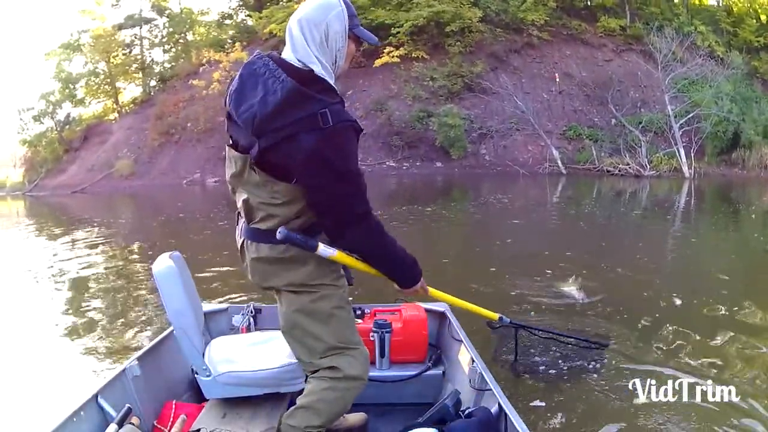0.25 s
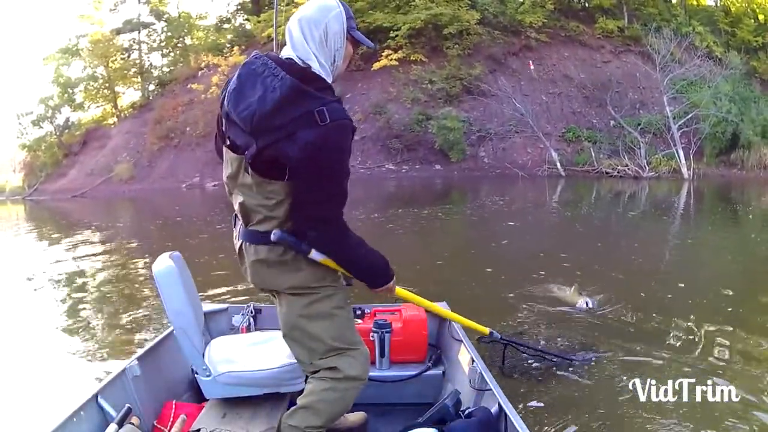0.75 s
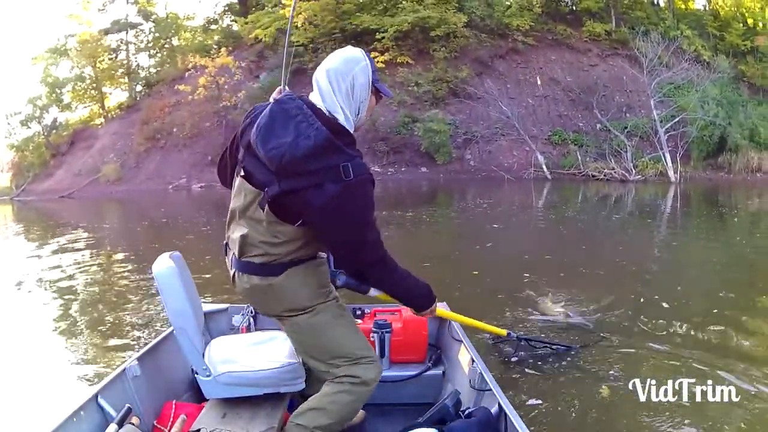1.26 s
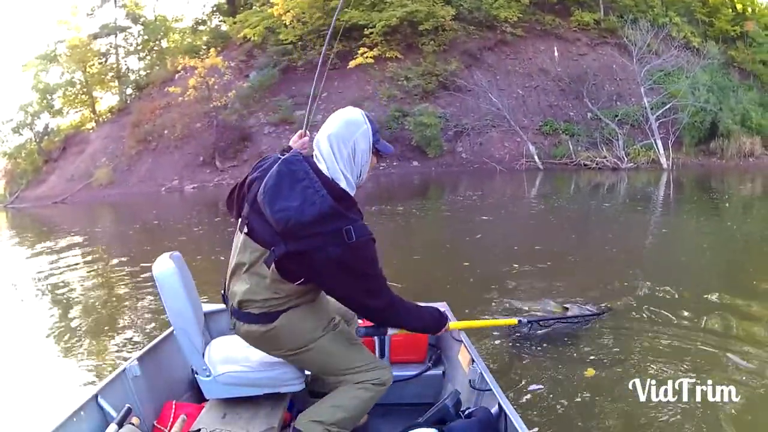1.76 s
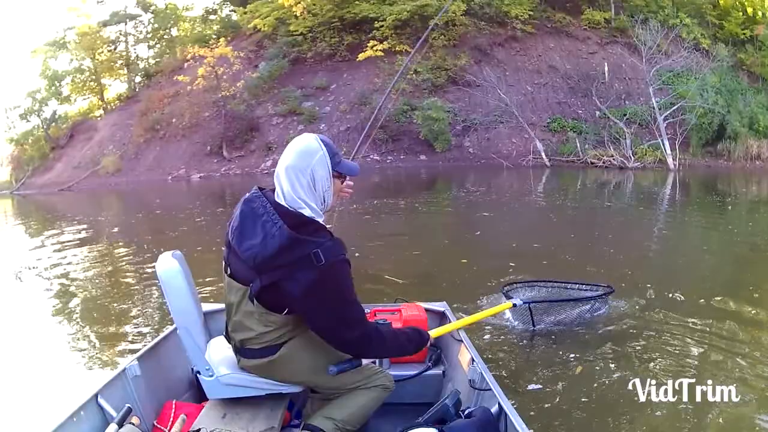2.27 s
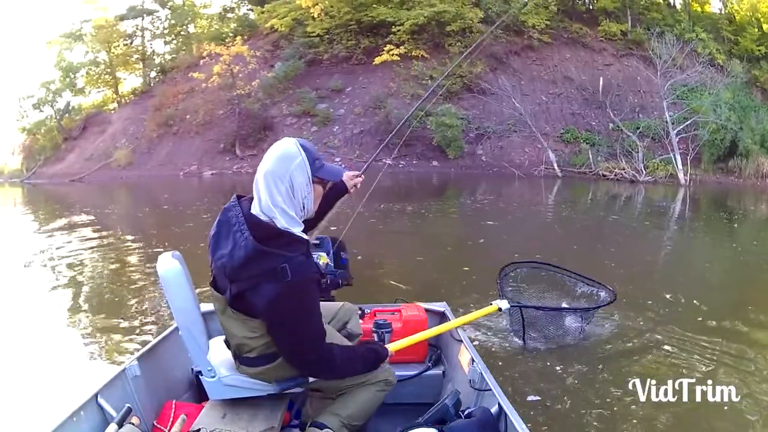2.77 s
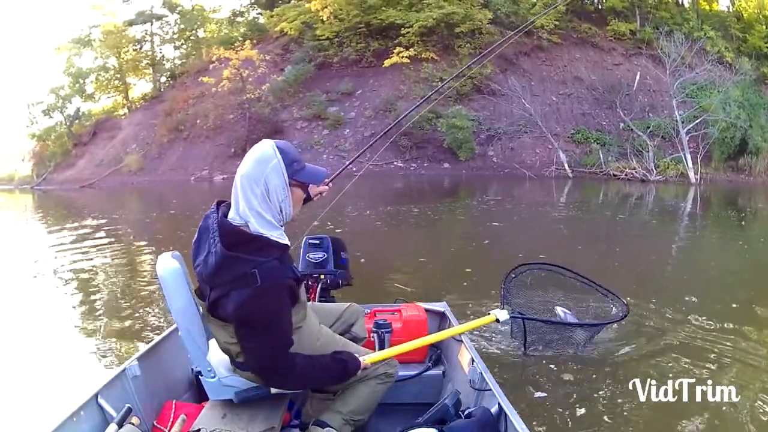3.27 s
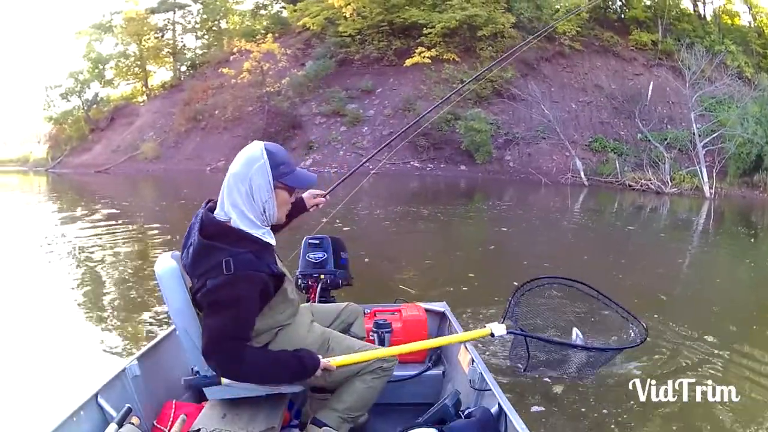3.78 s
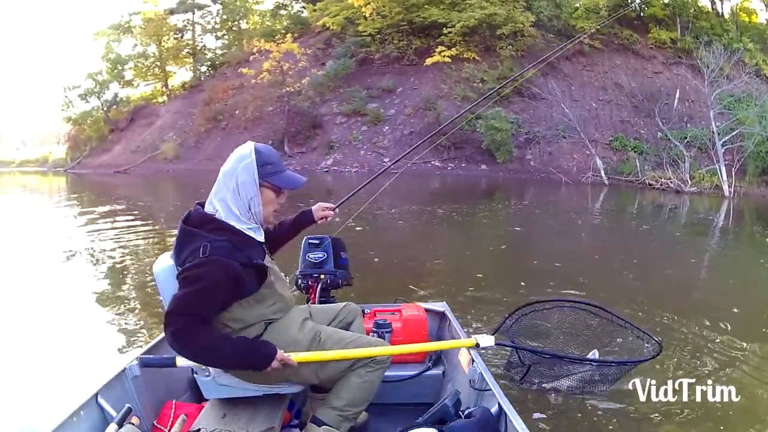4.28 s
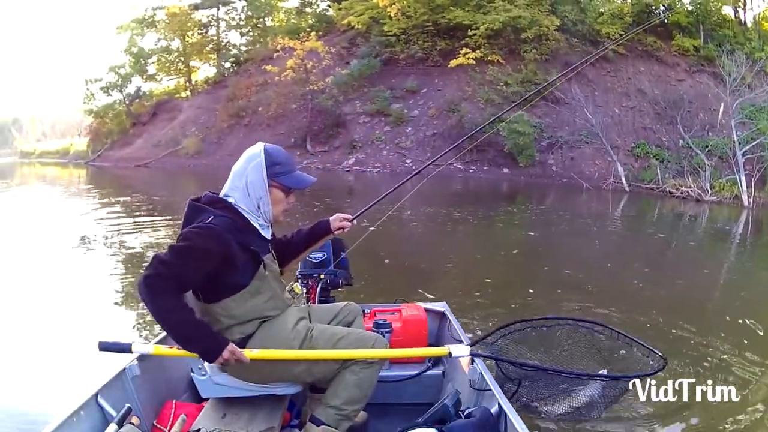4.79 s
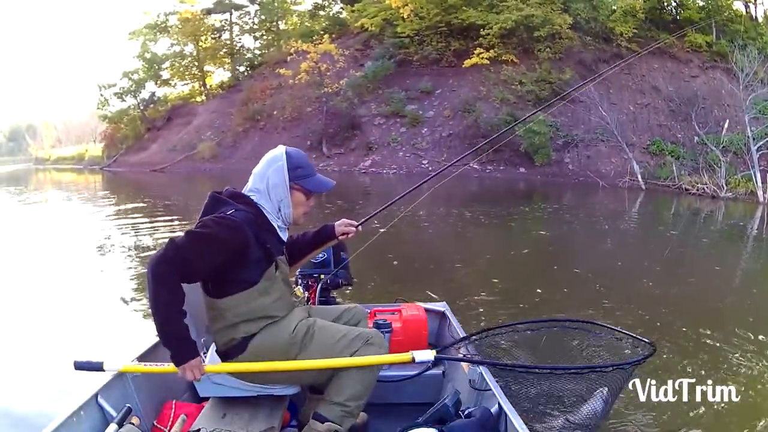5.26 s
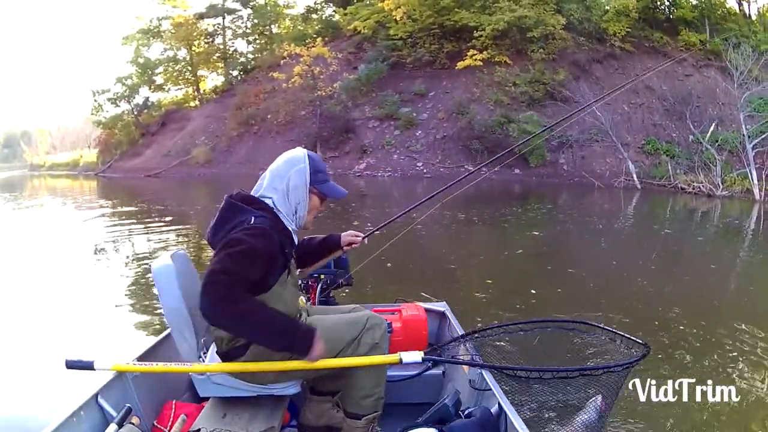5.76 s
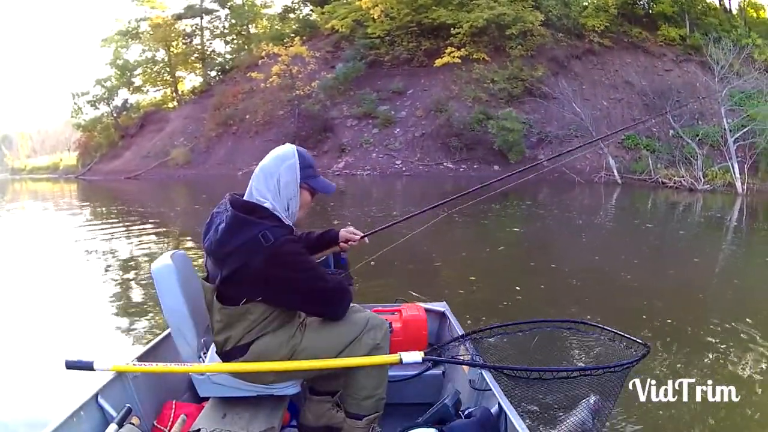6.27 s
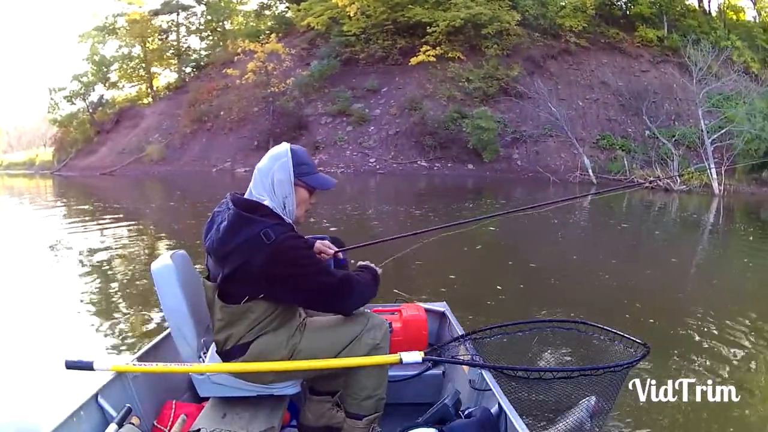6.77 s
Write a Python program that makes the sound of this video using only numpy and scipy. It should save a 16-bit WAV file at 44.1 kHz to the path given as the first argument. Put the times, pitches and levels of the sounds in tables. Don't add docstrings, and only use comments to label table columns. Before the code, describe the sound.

One dull thump in a small aluminium boat, net drips and faint rubbing, then a burst of loud hollow metallic knocks that clatter to rest.

```python
import sys
import numpy as np
from scipy import signal
from scipy.fft import rfft, irfft
from scipy.io import wavfile
from scipy.ndimage import uniform_filter1d, map_coordinates

SR = 44100
rng = np.random.default_rng(int(sys.argv[2]) if len(sys.argv) > 2 else 0)


def to_wav(s):
    ch = np.atleast_2d(s).T
    pcm = np.round(np.clip(ch, -1, 1) * 32767)
    wavfile.write(sys.argv[1], SR, pcm.astype(np.int16))


def boost(x):
    u = np.asarray(x, float) / 20
    return 10 ** u


N = 310023

# start_s, level_db (peak), weight_db (low modes), hardness_db (crack), chatter_s
NUDGES = [
    (2.593, -41.5, 4, -9, 0.007),
    (2.918, -40, -12, -28, .03),
    (3.372, -36.5, 1, -37, 0.034),
    (4.045, -29.5, -14, -30.5, .02),
]
KNOCKS = [(4.452, -21.5, 1.5, -25.5, 0.022), (4.482, -24, 3, -58, 0.061), (4.512, -26.5, 5, -48, 0.018),
          (4.567, -27, -23, -33, .008), (4.643, -23.5, -6, -20.5, .008), (4.653, -16, -7, -21, 0.0031),
          (4.731, -22.5, -1.5, -21, 0.0042), (4.854, -9, -5, -21, 0.0094), (4.868, -14, -4, -41, 0.0053),
          (4.907, -9.5, 1, -10.5, 0.0078), (4.924, -15, -10, -30, 0.0061)]
RATTLE = [(5.108, -17, 3, -12.5, 0.017), (5.135, -24, 1, -40, 0.024), (5.176, -17.5, 3, -15, 0.014),
          (5.204, -26.5, -1, -42, 0.011), (5.276, -29.5, -15, -8.5, 0.0082),
          (5.282, -18.5, 2.5, -14.5, 0.019), (5.373, -19.5, -3, -14, 0.017), (5.403, -16, 2, -21.5, 0.012),
          (5.416, -17.5, 4, -25, 0.012), (5.43, -15.5, -7, -29, 0.012), (5.458, -22, 7, -16, 0.018),
          (5.499, -36, 22.5, -19, 0.0083), (5.562, -33, 6, -22, 0.02), (5.591, -25, -9, -20.5, 0.004)]
SIT_DOWN = [
    (1.89, -35.5, 2, -13, 0.038),
    (1.9215, -11.5, 2, -20, 0.0022),
]

# pitch_hz, level_db, t60_s
HULL_MODES = [(74, -15, 0.69), (116.3, -15.5, 0.53), (137.7, -12.5, 0.98), (175, -7, 0.3),
              (280.2, -4, 0.29), (308.2, -5.5, 0.44), (353, 0, 0.16), (432, -7, 0.5), (461.5, -1.5, 0.35),
              (524.5, -3, 0.25), (611, -6, 0.082), (600, -8, 0.45), (689, -4, 0.42), (725, -4.5, 0.11),
              (830, -27, 0.067), (824, -2, 0.4), (917, 0.5, 0.13), (945, -2.5, 0.28), (983, 0, 0.25),
              (1040, -60.5, 0.28), (1168, -2.5, 0.24), (1206, -2.5, 0.19), (1540, -13.5, 0.23),
              (1606, -10.5, 0.15), (1760, -17, 0.18), (2060, -11, 0.064), (2230, -31, 0.12),
              (2720, -11.5, 0.073), (3010, -11, 0.07)]
# pitch_hz, level_db, t60_s
BENCH_MODES = [(226.7, -15.5, 0.3), (287, -15.5, 0.19), (317, -14, 0.23), (435.6, -18.5, 0.37),
               (525, -21, 0.2), (601, -17, 0.24), (626, -21, 0.16), (667, -9, 0.26), (678, -18, 0.15),
               (722, -3, 0.19), (790, -26, 0.11), (855, -11, 0.055), (918, -20, 0.085), (1008, -15, 0.17),
               (1180, -13.5, 0.19), (1480, -9, 0.17)]
# pitch_hz, level_db, t60_s
RIM_MODES = [(293, -8, 0.085), (414, -5.5, 0.13), (482.3, -9.5, 0.37), (600, -12, 0.39), (705, -18, 0.16),
             (762, 0, 0.06), (864, -5, 0.26), (923.5, -3.5, 0.2), (930, -0.5, 0.16), (1001, -8, 0.64),
             (1062, -11, 0.086), (1160, -9, 0.27), (1220, -15.5, 0.19), (1340, -30, .04),
             (1660, -11, 0.037), (2170, -13, 0.044)]
# pitch_hz, level_db, t60_s
DENT_MODES = [
    (869, 1.5, 0.08),
    (945, -18, 0.037),
]
# pitch_hz, density_db (per Hz)
SHEET_SPECTRUM = [(100, -59), (250, -8), (700, -6.5), (980, -3), (1100, -31), (1220, -39), (1400, -25.5),
                  (2200, -17.5), (3200, -28.5), (4000, -36), (5000, -64), (7000, -67)]
# pitch_hz, density_db (per Hz)
CRACK_SPECTRUM = [(1350, -25), (2300, -11.5), (2600, -42), (3110, -24.5), (3990, -20), (7110, -24),
                  (12100, -20.5), (16000, -28)]
# pitch_hz, t60_s
CRACK_DECAY = [(300, 0.37), (1000, 0.28), (2000, 0.14), (4000, 0.076), (8000, 0.073), (15000, 0.061)]

# start_s, level_db, pitch_hz, t60_s
BENCH_NOTES = [(1.9212, -9, 867, 0.087), (1.9212, -20, 640, 0.082), (1.922, -26.5, 1185, 0.1),
               (1.924, -26, 302, 0.073), (1.93, -17, 947, 0.06), (1.944, -17, 725, 0.089),
               (1.945, -24.5, 1003, 0.13), (1.968, -20.5, 612, 0.14), (1.97, -30, 427, 0.21),
               (1.965, -34, 840, 0.091), (1.922, -31, 1600, 0.027)]
# start_s, level_db, pitch_hz, t60_s
PANEL_NOTES = [(5.417, -32.5, 1835, 0.094), (5.418, -41, 2234, .1), (5.431, -38, 1565, .1),
               (5.458, -38, 2070, 0.075), (4.452, -21.5, 624, 0.13), (4.453, -24.5, 858, .1),
               (4.487, -27, 861, 0.24), (4.49, -27, 705, 0.29), (4.506, -31, 984, .12),
               (4.643, -38, 825, 0.08), (4.728, -31, 471, 0.1), (4.733, -30, 946, 0.097),
               (4.756, -33.5, 623, 0.18), (4.835, -28, 966, 0.18), (4.855, -9, 904, 0.059),
               (4.858, -20.5, 290, 0.13), (4.867, -18, 930, .07), (4.874, -21, 688, 0.18),
               (4.88, -25, 615, 0.05), (4.907, -15, 860, 0.062), (4.908, -20, 1199, 0.15),
               (4.91, -15, 285, 0.11), (4.92, -15.5, 618, 0.1), (4.924, -15.5, 683, 0.16),
               (4.96, -21.5, 118, 0.19), (4.975, -41, 690, 0.12), (4.975, -26, 887, 0.1),
               (5.109, -21, 896, .07), (5.125, -28, 618, 0.1), (5.14, -19, 474, 0.094),
               (5.178, -22, 890, 0.076), (5.373, -29, 600, 0.13), (4.869, -25.5, 177, .2),
               (5.195, -23.5, 476, 0.18), (5.283, -30, 611, 0.26), (5.283, -34, 850, 0.19),
               (5.416, -17.5, 701, 0.26), (5.416, -18.5, 966, 0.19), (5.44, -21, 988, 0.13),
               (5.44, -25, 689, 0.15), (5.453, -21, 186, 0.25), (5.47, -28.5, 489, 0.25),
               (5.591, -28.5, 945, 0.14), (2.81, -37, 856, 0.12), (2.915, -37, 868, 0.18),
               (4.455, -27, 300, 0.19), (4.46, -29, 462, .2), (4.455, -40.5, 1195, 0.26),
                 (4.647, -22, 925, 0.096), (4.643, -28, 1185, 0.12), (4.73, -32.5, 1190, 0.2),
                 (4.855, -25, 1170, 0.11), (4.862, -34, 1550, .08), (4.912, -27, 1550, .1),
                 (5.112, -22.5, 290, .1), (5.118, -28, 1100, 0.19), (5.176, -35, 1000, 0.11),
                 (5.195, -25, 705, 0.11), (5.283, -29, 305, 0.073), (5.3, -28, 1030, .14),
                 (5.305, -29, 477, .12), (5.405, -22, 360, 0.2), (3.36, -44, 1001, .3),
                 (3.95, -47.5, 1001, 0.54), (5.373, -29, 860, 0.054), (4.045, -44.5, 1001, .7),
                 (3.8, -53, 1001, .8), (4.2, -46.5, 1001, .8)]

# start_s, pressure_db
RESTING = [
    (1.95, -41),
    (2.07, -52),
    (2.5, -57.5),
    (2.56, -54),
    (2.77, -47),
    (2.88, -58),
    (2.99, -57),
    (3.75, -53),
    (4.13, -55),
    (4.44, -52),
]
# start_s, pressure_db
SLIDING = [(4.5, -50), (4.63, -44.5), (4.72, -41), (4.81, -40.5), (4.95, -47), (5.18, -54), (5.33, -42.5),
           (5.5, -42.5), (5.64, -49), (5.7, -65), (5.78, -66)]
# pitch_hz, width_hz, level_db (over the pressure)
SINGING_MODES = [
    (1001, 6.73, -7),
    (1160, 14, -14),
    (1200, 14, -13.5),
]
# start_s, level_db, pitch_hz, length_s
FLOOR_BOOMS = [
    (4.84, -24.5, 168, 0.25),
    (5.4, -17, 204, 0.11),
    (5.47, -18, 76.4, 0.21),
]
# start_s, level_db, pitch_hz, length_s
HOOP_CLINKS = [
    (5.278, -38, 3870, 0.026),
    (5.456, -39, 3970, 0.018),
    (5.588, -50.5, 4000, 0.018),
]

# start_s, level_db (peak), pitch_hz
DROPS = [(.386, -55, 1400), (.7044, -53, 1350), (.7228, -48, 2070), (.7444, -49, 2070), (.9507, -46, 2250),
         (.9574, -47, 1490), (1.1394, -51, 1450), (1.4656, -41, 1910), (1.5075, -46, 2190),
         (1.5484, -41, 1980), (1.7779, -45, 1900), (2.0622, -36, 1350), (2.077, -43, 4550),
         (2.303, -39, 5700), (2.06, -39, 2200), (2.377, -46, 2100), (2.064, -36, 1050), (2.0844, -48, 2650),
         (2.1375, -38, 2050), (2.1824, -40, 1400), (2.2094, -39, 1280), (2.2473, -38, 1590),
         (2.3052, -40, 2230), (2.354, -34.5, 2270), (2.52, -40, 1390), (2.594, -35, 1900),
         (2.6306, -40, 1780), (2.6594, -50, 1760), (2.6994, -53, 1650), (2.8544, -41, 2040),
         (3.0024, -41, 1850), (3.2725, -45, 1830), (3.3568, -48, 1660), (3.4326, -43, 1650),
         (3.9689, -50, 1650)]
# start_s, level_db (peak), pitch_hz
SMALL_DROPS = [(.645, -44, 4800), (.9762, -41, 4440), (1.0076, -43, 3180), (1.3114, -41, 4030),
               (2.0073, -40, 5900), (2.02, -47, 3000), (2.25, -37, 5300), (2.262, -46, 4200),
               (2.0747, -39, 9000), (2.0747, -47, 11800), (2.0941, -47, 9500), (2.1834, -49, 9000),
               (2.2233, -35, 11000), (2.2233, -43, 8500), (2.2996, -44, 11500), (2.348, -41, 7800),
               (2.209, -42, 2300), (2.0747, -46, 2800), (2.0941, -36, 5690), (2.153, -50, 3320),
               (2.1834, -39, 3780), (2.2239, -29.5, 4300), (2.2544, -45, 3590), (2.304, -46, 8000),
               (2.348, -37, 3450), (2.4245, -39, 4430), (2.4628, -46, 4490), (2.5144, -45, 3810),
               (2.5935, -48, 3830), (2.7806, -44, 3600), (3.4521, -44, 4590)]
# start_s, level_db, pitch_hz, length_s
SLOSHES = [(.68, -59, 1480, 0.087), (.685, -37, 950, 0.069), (.7, -52, 2100, 0.075), (.93, -66, 1800, .04),
           (2.183, -32, 1000, 0.01), (2.21, -34, 1300, 0.0083), (2.245, -53, 3500, 0.018),
           (2.04, -49, 1830, 0.034), (2.17, -49, 1690, 0.16), (2.57, -44, 1820, 0.18),
           (2.6, -29, 725, 0.18), (2.85, -33, 740, 0.12)]
# start_s, level_db, pitch_hz, length_s
RUSTLES = [
    (6.15, -60, 9500, .03),
    (6.455, -65, 9500, .03),
    (6.783, -60, 9300, 0.15),
    (6.98, -57, 8500, 0.031),
]

# start_s, level_db (peak)
LOW_TICKS = [(.07, -52), (.31, -50), (.5457, -54), (.9014, -54), (1.1, -51), (1.307, -50), (2.2997, -50),
             (2.676, -52), (3.603, -56), (4.0542, -54), (6.112, -49)]
# start_s, level_db (peak)
HIGH_TICKS = [(.2598, -45), (.677, -47), (.689, -46), (.703, -47), (3.134, -53), (3.305, -55),
              (3.9938, -52), (4.207, -54), (4.632, -54), (5.135, -50), (5.6421, -52), (5.765, -53),
              (5.787, -51), (5.832, -52), (6.007, -52), (6.2687, -51), (6.488, -50), (6.506, -49),
              (6.6518, -50), (6.8453, -50)]
# pitch_hz, width_hz, level_db
FAR_CHORUS = [
    (2766, 90, -79),
    (5500, 200, -80.5),
    (11000, 150, -81),
    (13720, 200, -78),
]
# start_s, level_db, start_hz, end_hz, length_s
CHIRPS = [
    (3.44, -71, 4720, 4200, .085),
    (4.02, -68, 4650, 4080, 0.068),
    (4.17, -67, 4680, 4050, 0.067),
]

# pitch_hz, density_db (per Hz)
RUMBLE_SPECTRUM = [(7.1, -53), (12, -16), (49, -1), (109, -6.5), (183, -16), (205, -29), (220, -16.5),
                   (290, -24.5), (480, -120)]
RIVER_SPECTRUM = [(76, -37), (130, 2), (205, -3), (285, 0), (315, -2), (344, -6.5), (396, -7), (420, -7),
                  (474, -11.5), (698, -6), (1400, -26), (1820, -34), (3080, -120)]
RIPPLE_SPECTRUM = [(650, -0.5), (1100, -12), (1330, -6.5), (1900, -0.5), (2470, -5.5), (2710, -8.5),
                   (3500, -15.5), (4550, -17), (7700, -120)]
HISS_SPECTRUM = [(1800, -27), (3000, -8.5), (3840, -1), (4780, -6), (5310, -4), (7780, -7.5), (10700, -4),
                 (11500, -5.5), (13600, -3), (14500, -3), (16500, -6.5)]
# start_s, strength_db
BREEZE_LEVEL = [(0, -47), (.41, -44.5), (1.33, -48), (1.84, -42), (2.6, -46.5), (3.07, -41.5), (3.68, -45),
                (4.38, -42.5), (4.8, -44), (5.35, -48), (5.93, -47.5), (6.52, -49.5), (7.03, -51.5)]
# start_s, share (0-1)
WATER_STIR = [(0, 0.13), (1.5, 0.07), (2.09, 1), (2.5, 0.5), (3.0, 0.83), (4.4, 0.73), (5.6, 0.44),
              (5.95, 0.33), (6.55, 0.36), (7.03, 0.96)]
# start_s, level_db
MOTOR_LEVEL = [(0, -52.5), (.8, -59), (1.0, -47), (1.3, -54.5), (2.5, -54), (2.8, -54.5), (3.4, -84),
               (5.4, -60), (5.8, -66), (7.03, -72)]
# pitch_hz, gain_db
BAND_LIMIT = [
    (15700, 0),
    (15880, -30),
    (16600, -45),
    (17000, -100),
]


def unit(x):
    return x / np.sqrt(np.mean(x ** 2) + 1e-20)


def along(points, hz):
    f, v = np.transpose(points)
    return np.interp(np.log(hz + 1), np.log(f + 1), v)


def curve(rows):
    s, value = np.transpose(rows)
    return np.interp(np.arange(N) / SR, s, value)


def wobble(rate):
    knots = rng.standard_normal(int(N * rate / SR) + 4)
    return map_coordinates(knots, [np.arange(N) * rate / SR])


def add(track, s, sound):
    part = track[round(s * SR):][:len(sound)]
    part += sound[:len(part)]


def rush(spectrum, patchy_db):
    hz, _, z = signal.stft(rng.standard_normal(N + 1024), SR, nperseg=1024)
    field = uniform_filter1d(rng.standard_normal(z.shape), size=8, axis=0)
    field = unit(uniform_filter1d(field, size=5, axis=1))
    gain = boost(along(spectrum, hz)[:, None] + patchy_db * field)
    return unit(signal.istft(z * gain, nperseg=1024)[1][:N])


def bursts(events, sharpness, gain_db):
    out, t = np.zeros(N), np.arange(SR // 4) / SR
    for s, db, hz, length in events:
        rasp = rng.standard_normal(len(t)) * np.sin(np.pi * np.clip(t / length, 0, 1)) ** 0.29
        b, a = signal.iirpeak(min(hz, 15000), sharpness, SR)
        puff = signal.lfilter(b, a, signal.lfilter(b, a, rasp))
        add(out, s, boost(db + gain_db) * puff)
    return out


def ringing(modes, gain_db, blur_hz):
    coarse = 6
    t = np.arange(0, SR // 3, coarse) / SR
    hz, db, t60 = np.tile(np.transpose(modes), 3)[:, :, None]
    neighbour = np.arange(len(hz))[:, None] >= len(modes)
    hz = hz + neighbour * blur_hz * rng.standard_normal(hz.shape)
    gain_db = np.resize(gain_db, len(hz))[:, None]
    rise = 1 - np.exp(-t * hz / .9)
    level = boost(db + gain_db - 6 * neighbour - 60 * t / t60) * rise
    ring = np.sum(level * np.sin(2 * np.pi * (hz * t + rng.random(hz.shape))), axis=0)
    return signal.resample_poly(ring, coarse, 1)


def dent(t):
    tones = sum(boost(db - 60 * t / t60) * np.sin(2 * np.pi * hz * t) for hz, db, t60 in DENT_MODES)
    return tones * (1 - np.exp(-t / 0.00049))


def crack_and_sheet(t, colour, hardness_db, chatter, sheet_db):
    hz, age, z = signal.stft(rng.standard_normal(len(t)), SR, nperseg=192)
    octaves = np.log2(np.maximum(hz / 4000, 1))
    crack = boost(along(CRACK_SPECTRUM, hz) + hardness_db * (1 + 0.14 * octaves) + 15.5)
    sheet = boost(along(SHEET_SPECTRUM, hz) + along(colour, hz) + sheet_db)
    hold = 0.51 * chatter * np.minimum(1, 4000 / (hz[:, None] + 1)) ** 1.2
    fall_db = -60 * np.maximum(age - hold, 0) / along(CRACK_DECAY, hz)[:, None]
    dense = signal.istft(z * (crack + sheet)[:, None] * boost(fall_db), nperseg=192)[1]
    return dense[:len(t)] * (1 - np.exp(-t / 0.00098))


def blows(events, modes, bright_db, trim_db, scatter_db, blur_hz, sheet_db, dent_db):
    out, t = np.zeros(N), np.arange(SR // 4) / SR
    mode_hz = np.transpose(modes)[0]
    for s, db, weight_db, hardness_db, chatter in events:
        high_db = bright_db + 0.67 * hardness_db
        colour = [(250, weight_db), (750, 0), (1000, 0), (1200, 0.43 * high_db), (1500, high_db)]
        gain_db = along(colour, mode_hz) + scatter_db * rng.standard_normal(len(modes))
        ring = ringing(modes, gain_db, blur_hz)
        force = 0.045 * rng.standard_normal(len(t)) * np.exp(-(t / chatter) ** 2)
        force[0] += 1.8
        add(out, s, boost(db + trim_db) * signal.fftconvolve(force, ring))
        dull_db = 0.25 * min(high_db, 0) - 0.3 * weight_db
        add(out, s, boost(db + dent_db + dull_db) * dent(t))
        add(out, s, boost(db) * crack_and_sheet(t, colour, hardness_db, chatter, sheet_db))
    return out


def handle_on_hull():
    return blows(NUDGES + KNOCKS + RATTLE, HULL_MODES, bright_db=11.0, trim_db=-22, scatter_db=0.5,
                 blur_hz=22.53, sheet_db=6.0, dent_db=-9)


def angler_sits():
    return blows(SIT_DOWN, BENCH_MODES, bright_db=-7.0, trim_db=-11, scatter_db=-1.0,
                 blur_hz=36.2, sheet_db=6.5, dent_db=-24)


def panel_notes():
    out, t = np.zeros(N), np.arange(SR // 4) / SR
    for s, db, hz, t60 in BENCH_NOTES + PANEL_NOTES:
        rise = 1 - np.exp(-t * hz / 1.44)
        add(out, s, boost(db - 60 * t / t60) * rise * np.sin(2 * np.pi * hz * t))
    return out


def rubbing():
    grit = rng.standard_normal(N) * boost(2.5 * wobble(60) + 1.2 * wobble(14))
    spots = []
    for _ in range(2):
        ring = ringing(RIM_MODES, 0.69 * rng.standard_normal(len(RIM_MODES)), blur_hz=19.3)
        spots.append(signal.oaconvolve(grit, ring)[:N])
    turn = wobble(3)
    rim = unit(np.cos(turn) * spots[0] + np.sin(turn) * spots[1])
    s = np.arange(N) / SR
    scrape = boost(-13.5) * rush(RIPPLE_SPECTRUM, patchy_db=5.0)
    fizz = boost(-25.5) * rush(HISS_SPECTRUM, patchy_db=1.5)
    friction = rim + (scrape + fizz) * (s > SLIDING[0][0])
    touching = (s > RESTING[0][0]) * (s < SLIDING[-1][0])
    return boost(curve(RESTING + SLIDING) + 3.0) * friction * touching


def singing_rim():
    s, lines = np.arange(N) / SR, np.zeros(N)
    for hz, width_hz, db in SINGING_MODES:
        lines += boost(db + 2.5 * wobble(2.88)) * wobble(width_hz) * np.sin(2 * np.pi * hz * s)
    return boost(curve(RESTING)) * lines * (s > 2.1) * (s < RESTING[-1][0])


def floor_and_hoop():
    return bursts(FLOOR_BOOMS, sharpness=0.79, gain_db=5.0) + bursts(HOOP_CLINKS, sharpness=9.1, gain_db=9.5)


def drips():
    out, t = np.zeros(N), np.arange(SR // 20) / SR
    patter_s = 2.03 + 0.3 * rng.exponential(size=260)
    patter_db = -51.5 + 3.5 * rng.standard_normal(260)
    patter_hz = 3000 * np.exp(.45 * rng.standard_normal(260))
    patter = np.c_[patter_s, patter_db, patter_hz]
    for drops, life_cycles in (DROPS, 14), (SMALL_DROPS, 4.1), (patter, 4.1):
        for s, db, hz in drops:
            age = t * hz / life_cycles
            envelope = np.exp(-2.5 * age) * (1 - np.exp(-12 * age))
            bubble = np.sin(2 * np.pi * hz * t * (1 + 0.034 * age))
            add(out, s, 0.66 * boost(db) * envelope * bubble)
    return out


def slosh_and_rustle():
    return bursts(SLOSHES + RUSTLES, sharpness=1.93, gain_db=0.0)


def insects():
    tick_s = 0.018
    low = [(s, db, 12700, tick_s) for s, db in LOW_TICKS]
    high = [(s, db, 13550, tick_s) for s, db in HIGH_TICKS]
    core = [(s, db, 13700, tick_s) for s, db in HIGH_TICKS]
    out = bursts(low + high, sharpness=3.8, gain_db=-0.5) + bursts(core, sharpness=22, gain_db=-1)
    t = np.arange(N) / SR
    for hz, width_hz, db in FAR_CHORUS:
        level = boost(db + 3 * wobble(30) + 1.5 * wobble(4))
        out += level * wobble(width_hz) * np.sin(2 * np.pi * hz * t)
    return out


def bird():
    out = np.zeros(N)
    for s, db, start_hz, end_hz, length in CHIRPS:
        hz = np.linspace(start_hz, end_hz, int(length * SR))
        add(out, s, boost(db) * np.hanning(len(hz)) * np.sin(2 * np.pi * np.cumsum(hz) / SR))
    return out


def far_motor():
    turns = np.cumsum(345.2 + 3.43 * wobble(7.4)) / SR
    return boost(curve(MOTOR_LEVEL) + 2.5 * wobble(12.0)) * np.sin(2 * np.pi * turns)


def river_and_air():
    stir = curve(WATER_STIR)
    lull_db = -1.5 * np.clip((np.arange(N) / SR - 5.53) / 0.59, 0, 1)
    rumble_db = curve(BREEZE_LEVEL) + 0.92 * wobble(4.46)
    river_db = -48.5 + 0.54 * stir + lull_db + 0.14 * wobble(4.9)
    ripple_db = -66.5 + 6 * stir + 0.11 * wobble(4.1)
    hiss_db = -65 + 2 * stir
    rumble = boost(rumble_db) * rush(RUMBLE_SPECTRUM, patchy_db=1.05)
    river = boost(river_db) * rush(RIVER_SPECTRUM, patchy_db=-0.1)
    ripple = boost(ripple_db) * rush(RIPPLE_SPECTRUM, patchy_db=2.5)
    hiss = boost(hiss_db) * rush(HISS_SPECTRUM, patchy_db=1.7)
    return rumble + river + ripple + hiss


def scene():
    boat = handle_on_hull() + angler_sits() + panel_notes() + rubbing() + singing_rim() + floor_and_hoop()
    water = drips() + slosh_and_rustle()
    background = insects() + bird() + far_motor() + river_and_air()
    return (boat + water + background)[None]


def camera_whine():
    t = np.arange(N) / SR
    line_hz, frame_hz = 15478.36, 57.326
    reading = (t * frame_hz + .36) % 1 < .69
    return boost(-67.5) * uniform_filter1d(reading * 1., size=30) * np.sin(2 * np.pi * line_hz * t)


def band_limit(x):
    return signal.sosfilt(signal.butter(12, 16630, fs=SR, output="sos"), x)


def record(dry):
    soft = dry / (1 + np.abs(dry / .5) ** 4) ** .25
    gain = boost(along(BAND_LIMIT, np.fft.rfftfreq(N, 1 / SR)))
    limited = irfft(rfft(soft + camera_whine()) * gain, N)
    return band_limit(limited)


dry = scene()
out = record(dry)
to_wav(out)
```